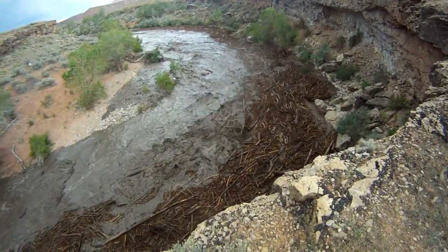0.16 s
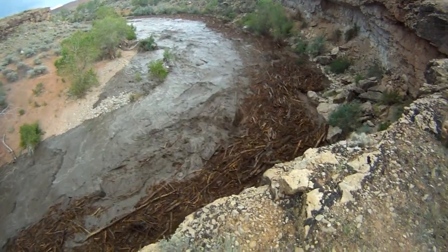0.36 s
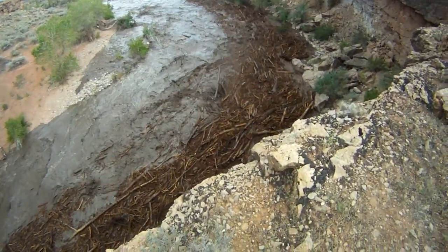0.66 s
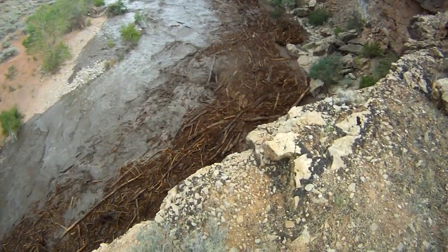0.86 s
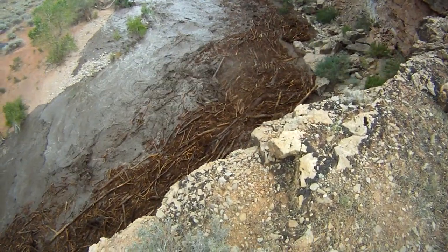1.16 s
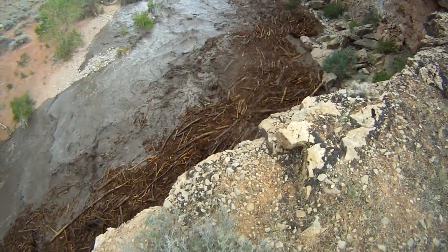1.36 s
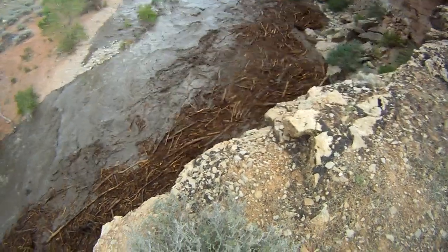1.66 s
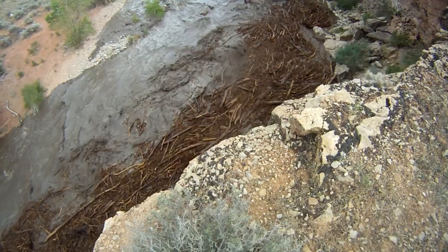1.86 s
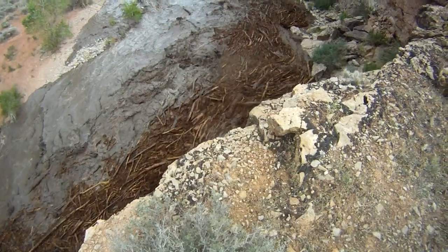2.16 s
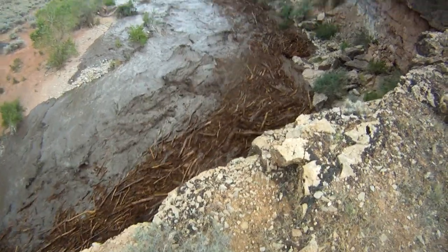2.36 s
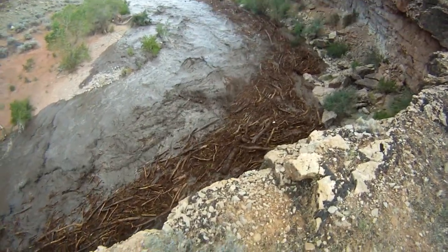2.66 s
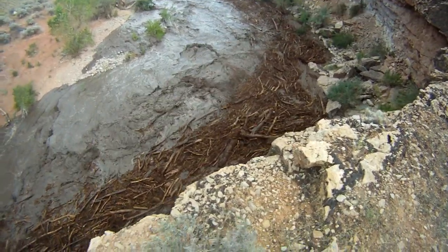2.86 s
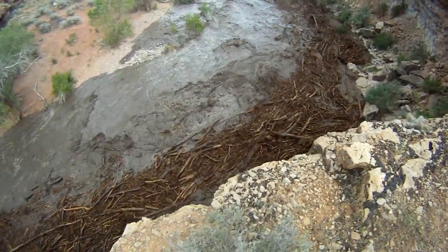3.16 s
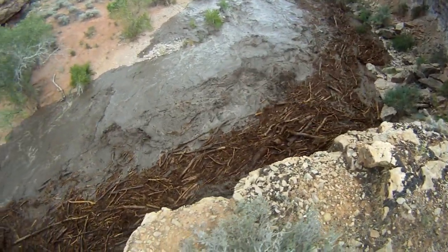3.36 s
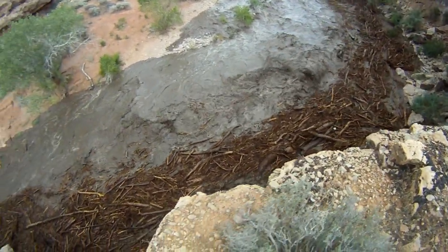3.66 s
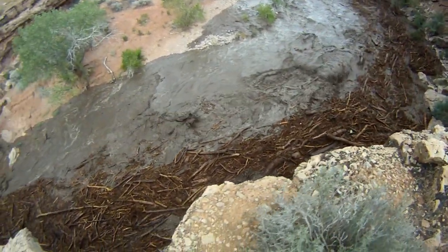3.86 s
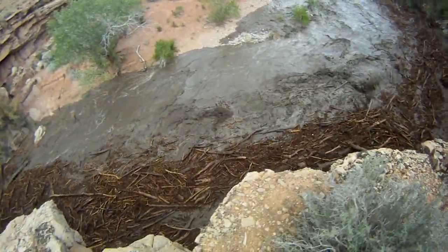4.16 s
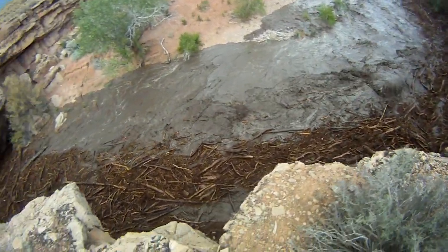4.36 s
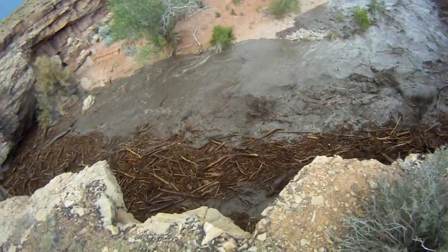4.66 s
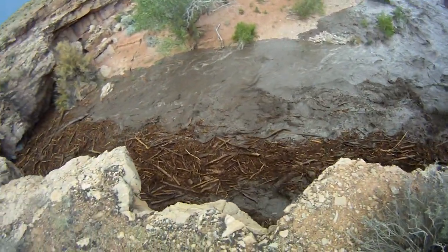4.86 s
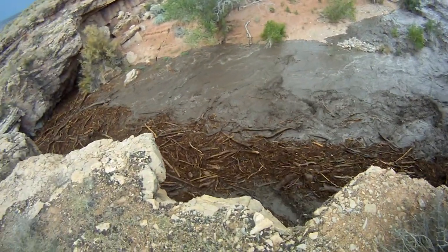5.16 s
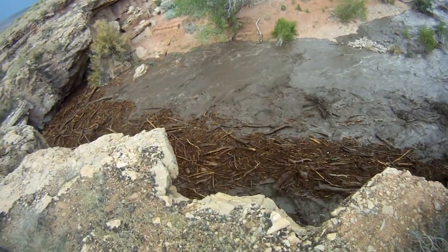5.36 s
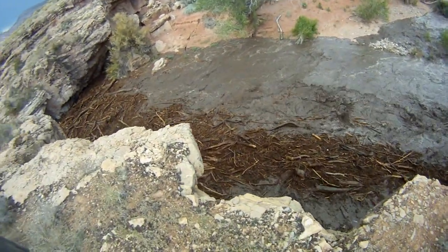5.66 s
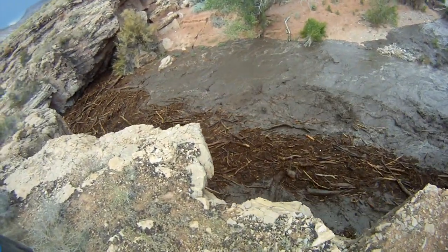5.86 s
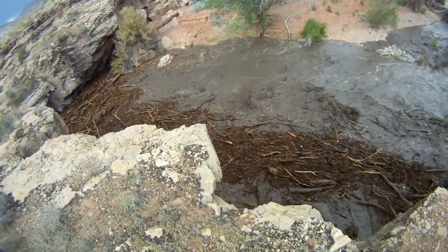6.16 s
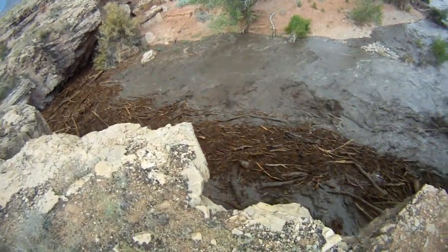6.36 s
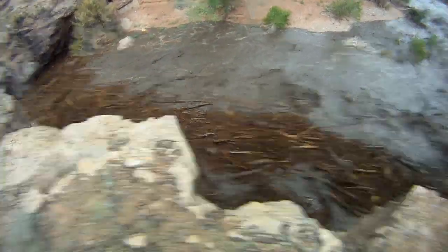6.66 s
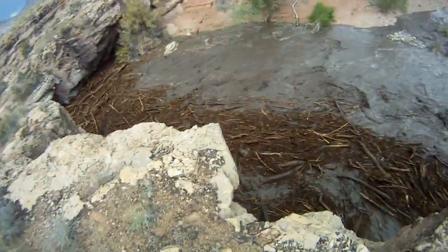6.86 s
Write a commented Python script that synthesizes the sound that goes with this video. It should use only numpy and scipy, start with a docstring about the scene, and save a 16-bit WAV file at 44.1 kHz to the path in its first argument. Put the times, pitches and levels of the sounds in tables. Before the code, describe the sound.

Close microphone handling noise, with scrapes, thumps and sharp ratcheting clicks, above faint rushing floodwater and an occasional driftwood crack.

```python
"""Handling noise above a flood

From a ledge, a small hand-held camera picks up a muddy flood rushing along the wash below, its driftwood
cracking now and then. Right at the microphone, and far louder than the water, fingers rub, slip, bump
and click on the camera body, and a light wind rumbles. The gain control ducks after loud clicks and
the sharpest ones overload the input."""
import sys
import numpy as np
from scipy import signal
from scipy.fft import rfft, irfft, next_fast_len
from scipy.io import wavfile
from scipy.ndimage import uniform_filter1d

SR = 44100
rng = np.random.default_rng(int(sys.argv[2]) if len(sys.argv) > 2 else 0)


def digitize_waveform(pressure):
    """Quantize a signal to 16-bit integers and store it at the path in sys.argv[1].

    Rows of a 2-D input are taken as channels; values are limited to [-1, 1].
    """
    field = np.atleast_2d(pressure).T
    bounded = np.clip(field, -1, 1)
    quanta = np.round(bounded * 32767).astype(np.int16)
    wavfile.write(sys.argv[1], SR, quanta)


N = 309582

# finger strokes on the camera: start_s, level_db, rise_s, fall_s, grip (0-1), grille_share (0-1)
FINGER_STROKES = [(.05, -43, 0.047, .17, 0.5, 0.27), (.146, -13, .009, .023, .9, .4),
                  (1.589, -23, .002, 0.022, 0.48, 0.2), (1.656, -11.5, 0.023, 0.0093, 0.52, 0.23),
                  (1.68, -22, 0.019, 0.055, 0.2, 0.67), (1.774, -20, 0.024, 0.033, 0.05, .32),
                  (1.813, -30, 0.051, 0.03, .6, .25), (2.19, -37.5, .26, .42, .15, .25),
                  (2.538, -13, .002, 0.008, 1, 0), (2.66, -21, .014, 0.0093, 1, 0),
                  (2.767, -19.5, 0.044, 0.071, 0.08, 0.66), (6.688, -36.5, 0.085, .095, 0.13, 0.23),
                  (6.931, -17, .005, .032, 0, 0), (6.948, -29, 0.02, 0.089, 0, 0.05)]
# skin on the case with a light touch: frequency_hz, level_db
LIGHT_TOUCH_SPECTRUM = [(600, -22), (880, 1), (1150, 7), (1450, -1.5), (2100, 3.5), (2700, -21),
                        (3700, -13.5), (4300, -37), (5100, -28), (7700, -32), (9200, -23), (10000, -10),
                        (14000, -7), (15200, -52)]
# skin on the case with a tight grip: frequency_hz, level_db
TIGHT_GRIP_SPECTRUM = [(500, -22.5), (1000, -14.5), (1900, 2.5), (2700, -12), (3600, -24.5), (4300, -42.5),
                       (7000, -56), (9000, -28), (10100, -11), (10900, -21.5), (13000, -57), (13900, -11.5),
                       (15200, -39.5)]
# skin across the microphone grille: frequency_hz, level_db
GRILLE_SPECTRUM = [(500, -28.5), (1000, -15.5), (2000, -5.5), (2800, 0), (3500, -1), (4300, -20),
                   (5000, 11.5), (5600, -15), (7000, -1.5), (7800, -29), (8400, -9.5), (10000, -17),
                   (10900, -23), (14500, -21)]
# shell resonances that every rub brings out: centre_hz, half_width_hz, gain_db
SHELL_RESONANCES = [(770, 150, 4), (2196, 124, 3), (3765, 92, 6), (4920, 200, -4.5), (8320, 100, 9),
                    (9880, 140, 4.5), (14800, 440, 5.5)]
# the skin catches and snaps free, plus one lone click of the control at 2.057 s: start_s, peak_db, grip (0-1)
SKIN_SLIPS = [(0.1427, 12, 0.47), (.277, -23.5, 1), (1.728, -3, 0.22), (2.057, -17, 0), (2.4875, -19.5, .4),
              (2.502, -18, .5), (2.552, 13.5, 0.91), (2.592, -17, 0.56), (2.6402, -16, 0.64),
              (2.7532, -19.5, 0.52), (2.824, 5.5, 0.34), (6.5904, 1, 0), (6.717, -23, 0.7),
              (6.768, -20, 0.8)]
# ringing of the plastic case: pitch_hz, level_db, t60_s
CASE_MODES = [(1285, -5.5, 0.014), (1783, 0, 0.0071), (2070, -5.5, 0.0085), (2447, 3, 0.0064),
              (3150, -3.5, 0.013), (3750, -18.5, 0.015), (4600, -2.5, 0.0018), (5580, -2, 0.0022),
              (7450, -29, 0.003), (8320, -18.5, 0.015), (8820, -12.5, 0.013), (9390, -15, 0.013),
              (10000, -13, 0.005), (14740, -14, .007), (15170, -26, .008)]
# a camera control ratchets: start_s, first_level_db, click_count (rounded), first_gap_s, final_gap_s
RATCHET_RUNS = [(1.8918, 24.5, 2, .0167, .01), (1.989, 23.5, 4.25, 0.015, 0.0094),
                (2.0819, 21, 6.05, .0232, .0047)]
# the hand bumps the body: start_s, level_db, push_hz, sway_share (0-1), ring_share (0-1)
HAND_BUMPS = [(.054, -10.5, 60.5, 0.02, 0.02), (1.591, 7, 66, 0.01, 0), (1.682, -2, 83.4, 0.05, 0.04),
              (1.726, -3.5, 79, 0, 0.01), (2.211, -13.5, 91, 0, 0.07), (2.502, -14.5, 123, 0, 0.12),
              (2.823, 1, 269, 0.07, .05), (6.249, -25, 99, 0.03, 0.12), (6.581, 5.5, 79, 0.17, 0.07),
              (6.674, -8, 53.4, 0.08, 0), (6.348, -42, 254, 0, 1), (6.77, -21, 255, 0, 1),
              (6.921, -2, 137, 0.29, 0.22)]
# the rushing water, heard from the ledge: frequency_hz, level_db
FLOOD_SPECTRUM = [(150, -4.5), (400, -8), (1000, -7), (1700, -5), (2800, -3.5), (4200, -14), (5500, -14.5),
                  (7700, -19), (9300, -14.5), (10700, -18), (13000, -19.5), (15200, -18)]
# the rock ledge shades one band while the camera faces it: time_s, centre_hz, depth_db
LEDGE_SHADE = [(.3, 1330, -2.5), (1, 1500, 5.5), (3, 1540, 4.5), (7, 1450, -0.5)]
# resonances of the microphone housing: centre_hz, half_width_hz, gain_db
HOUSING_RESONANCES = [(2232, 124, 10.5), (3585, 170, 6), (5080, 400, 8.5), (6960, 380, 9), (8460, 180, 5.5),
                      (9740, 108, 11), (14270, 82, 11)]
# driftwood cracks down in the stream: start_s, peak_db
WOOD_CRACKS = [(.876, -25), (3.998, -28), (4.675, -37), (5.452, -29), (5.775, -33), (6.178, -31.5)]
# wind and hand tremor at the microphone: frequency_hz, level_db
RUMBLE_SPECTRUM = [(12, -32), (30, 2.5), (50, -1.5), (90, -3), (140, -20.5), (210, -22), (270, -20),
                   (340, -25.5), (500, -46), (1200, -74)]
# the hand shifts its hold and the tremor swells: crest_s, half_width_s, level_db
HOLD_SHIFTS = [(.2, .11, -35), (.8, 0.067, -40), (1.12, 0.11, -43.5), (1.75, 0.092, -23),
               (2.42, 0.39, -34.5), (6.45, 0.093, -40), (6.72, 0.063, -24), (7.0, 0.055, -20)]
# two notches in the camera's sound: centre_hz, half_width_hz, gain_db
CAMERA_NOTCHES = [(5995, 417, -11.5), (11880, 907, -17)]


def finger_rubbing(smooth_db=-4, fullness=0.62, judder_db=1.5, judder_hz=70):
    """Each stroke is a dense run of tiny slips that swells and fades; the finger judders as it slides."""
    out = np.zeros(N)
    friction = unit(grains(N, per_s=1800, spread_db=2.3)) + amp(smooth_db) * rng.standard_normal(N)
    friction *= amp(judder_db * wander(judder_hz))
    for s, db, rise, fall, grip, grille in FINGER_STROKES:
        run = friction[round(s * SR):][:round((rise + fall) * SR)]
        pressure = np.interp(np.arange(len(run)) / SR, [0, rise, rise + fall], [0, 1, 0]) ** fullness
        rub = signal.fftconvolve(run, touch_response(grip, grille))[:len(run)]
        add(out, s, amp(db) * pressure * unit(rub))
    return out


def touch_response(grip, grille, size=1024):
    """What reaches the microphone through the case from one tiny slip of skin."""
    hz = abs(np.fft.fftfreq(size, 1 / SR))
    light_db = spectrum(LIGHT_TOUCH_SPECTRUM, hz)
    grip_db = grip * (spectrum(TIGHT_GRIP_SPECTRUM, hz) - light_db)
    grille_db = grille * (spectrum(GRILLE_SPECTRUM, hz) - light_db)
    log_gain = np.log(amp(light_db + grip_db + grille_db + bells(SHELL_RESONANCES, hz)))
    # minimum phase: the colour rings after the slip, never before
    return np.fft.ifft(np.exp(np.conj(signal.hilbert(log_gain)))).real


def skin_slips(length_s=0.0029, grille=0.56, ring_db=-6):
    """Skin snaps free: a brief crackle through the case, which rings more the looser the grip."""
    out, t = np.zeros(N), np.arange(SR // 80) / SR
    for s, db, grip in SKIN_SLIPS:
        burst = rng.standard_normal(len(t)) * np.exp(-(t / length_s) ** 2)
        skin = unit(touch_response(grip, grille * (1 - grip)))
        ring = unit(case_ring(np.arange(len(skin)) / SR, np.ones(len(CASE_MODES))))
        snap = signal.fftconvolve(burst, skin + amp(ring_db) * (1 - grip) * ring)
        add(out, s, amp(db) * snap / abs(snap).max())
    return out


def control_clicks(chatter=0.073, chatter_t60=0.011, push_db=-21, push_hz=150, push_t60=0.015):
    """Each hard snap of the control chatters a little, rings the case and nudges the microphone."""
    out, t = np.zeros(N), np.arange(SR // 20) / SR
    push = amp(push_db - 60 * t / push_t60) * np.sin(2 * np.pi * push_hz * t)
    clicks = list(ratchet())
    # the hand loads the case a little differently at each click
    detunes = rng.uniform(.992, 1.008, (len(clicks), len(CASE_MODES)))
    for (s, db), detune in zip(clicks, detunes):
        ring = case_ring(t, detune)
        blow = (t == 0) + chatter * rng.standard_normal(len(t)) * amp(-60 * t / chatter_t60)
        snap = 2 * signal.fftconvolve(blow, ring)[:len(t)] / ring[0]
        add(out, s, amp(db) * (snap + push))
    return out


def ratchet(gap_kept=.4, loss_db=4.5):
    """Start and level of each click: a run speeds up towards its final gap and weakens."""
    for s, db, count, first_gap, final_gap in RATCHET_RUNS:
        for k in range(round(count)):
            yield s, db - loss_db * k
            s += final_gap + (first_gap - final_gap) * gap_kept ** k


def case_ring(t, detune):
    """The modes of the plastic case after one sharp blow, each detuned by its own factor."""
    return sum(amp(db - 60 * t / t60) * np.cos(2 * np.pi * hz * factor * t)
               for (hz, db, t60), factor in zip(CASE_MODES, detune))


def hand_bumps(push_cycles=5.2):
    """A soft push dies within a few swings, leaving the camera swaying in the hand and its body ringing."""
    out = np.zeros(N)
    sway, ring = swing(hz=48, t60=0.82), swing(hz=262, t60=.17)
    for s, db, hz, sway_share, ring_share in HAND_BUMPS:
        push = swing(hz, t60=push_cycles / hz)
        add(out, s, amp(db) * (push + sway_share * sway + ring_share * ring))
    return out


def swing(hz, t60, rise_cycles=0.37):
    """One second of a dying low swing with a rounded start."""
    t = np.arange(SR) / SR
    onset = 1 - np.exp(-(t * hz / rise_cycles) ** 2)
    return onset * amp(-60 * t / t60) * np.sin(2 * np.pi * hz * t)


def flood(level_db=-45, patchy_db=0.84, swell_db=0.8, splash_db=-11):
    """Water churns below the ledge: a rush with drifting patches, grainy with countless splashes."""
    rush = rng.standard_normal(N) + amp(splash_db) * unit(grains(N, per_s=700, spread_db=4.5))
    hz, t, bands = signal.stft(rush, SR, nperseg=1024, noverlap=768)
    patches = uniform_filter1d(rng.standard_normal(bands.shape), size=12, axis=0)
    patches = unit(uniform_filter1d(patches, size=14, axis=1))
    swell = unit(uniform_filter1d(rng.standard_normal(len(t)), size=50))
    shade_hz, depth_db = follow(LEDGE_SHADE, t)
    shade_db = depth_db * bell(hz[:, None], shade_hz, width=340)
    bands *= amp(water_colour(hz)[:, None] - shade_db + patchy_db * patches + swell_db * swell)
    water = signal.istft(bands, nperseg=1024, noverlap=768)[1][:N]
    return unit(water) * amp(level_db)


def water_colour(hz):
    """The flood's spectrum in dB, heard through the microphone housing."""
    return spectrum(FLOOD_SPECTRUM, hz) + bells(HOUSING_RESONANCES, hz)


def driftwood(t60=0.021, bass_cut_hz=1500):
    """Sticks break below the ledge: short dry cracks with no bass."""
    out, t = np.zeros(N), np.arange(SR // 20) / SR
    for s, db in WOOD_CRACKS:
        burst = rng.standard_normal(len(t)) * amp(-60 * t / t60)
        crack = tint(burst, lambda hz: water_colour(hz) / 2 - 20 * bell(hz, 0, bass_cut_hz))
        add(out, s, amp(db) * crack / abs(crack).max())
    return out


def wind_and_tremor(breeze_db=-51.5, gust_db=3.0, gust_hz=14):
    """Low, lumpy buffeting on the microphone: a steady breeze, and a swell for each shift of the hand."""
    t = np.arange(N) / SR
    rumble = tint(rng.standard_normal(N), lambda hz: spectrum(RUMBLE_SPECTRUM, hz))
    gusts = amp(gust_db * wander(gust_hz))
    tremor_power = sum((amp(db) * bell(t, s, width)) ** 2 for s, width, db in HOLD_SHIFTS)
    return unit(rumble * gusts) * np.sqrt(amp(breeze_db) ** 2 + tremor_power)


def amp(db):
    """Decibels to gain."""
    return 10 ** (np.asarray(db) / 20)


def unit(x):
    """Scales to an rms of 1."""
    return x / np.sqrt(np.mean(x ** 2) + 1e-20)


def spectrum(points, hz):
    """Levels in dB, joined on a log-frequency axis."""
    point_hz, db = np.transpose(points)
    return np.interp(np.log(hz + 1), np.log(point_hz), db)


def follow(rows, t):
    """The columns of a curve at times t."""
    s, *columns = np.transpose(rows)
    return [np.interp(t, s, column) for column in columns]


def add(mix, s, sound):
    """Mixes a sound in at time s."""
    part = mix[max(round(s * SR), 0):][:len(sound)]
    part += sound[:len(part)]


def bell(x, centre, width):
    """A smooth bump of height 1."""
    return np.exp(-.5 * ((x - centre) / width) ** 2)


def bells(rows, hz):
    """Colour in dB of a set of peaks or dips."""
    return sum(db * bell(hz, centre, width) for centre, width, db in rows)


def tint(x, colour):
    """Filters x by a colour in dB that is a function of frequency."""
    size = next_fast_len(len(x))
    gain = amp(colour(np.fft.rfftfreq(size, 1 / SR)))
    return irfft(rfft(x, size) * gain, size)[:len(x)]


def wander(corner_hz):
    """Random drift with an rms of 1, mostly slower than corner_hz."""
    return unit(tint(rng.standard_normal(N), lambda hz: -40 * np.log10(1 + (hz / corner_hz) ** 2)))


def grains(samples, per_s, spread_db):
    """Random clicks, many small and a few large."""
    chance, size, sign = rng.random((samples, 3)).T
    size_db = spread_db * np.minimum(-np.log(1 - size), 4)
    return (chance < per_s / SR) * amp(size_db) * np.sign(sign - .5)


def scene():
    """Water below, wind and close handling all reach one microphone, which feeds both channels."""
    outdoors = flood() + driftwood() + wind_and_tremor()
    mono = outdoors + finger_rubbing() + skin_slips() + control_clicks() + hand_bumps()
    return np.array([mono, mono])


def record(dry, threshold_db=-22, slope=0.52, recover_db_per_s=130, attack_s=0.028, edge_hz=15400):
    """The camera ducks after loud peaks, clips what gets past, then notches and limits the treble."""
    lag = np.exp(-1 / (attack_s * SR))
    power = signal.lfilter([1 - lag], [1, -lag], np.clip(dry[0], -1, 1) ** 2)
    level_db = 10 * np.log10(power + 1e-12)
    # the gain control holds each peak and lets it sink at a steady rate
    fall_db = np.arange(N) * recover_db_per_s / SR
    held_db = np.maximum.accumulate(level_db + fall_db) - fall_db
    duck_db = slope * np.maximum(held_db - threshold_db, 0)
    clipped = np.clip(dry / amp(duck_db), -1, 1)
    notched = np.array([tint(channel, lambda hz: bells(CAMERA_NOTCHES, hz)) for channel in clipped])
    low_pass = signal.firwin(511, edge_hz, window=("kaiser", 9), fs=SR)
    return signal.oaconvolve(notched, low_pass[None], "same")


dry = scene()
out = record(dry)
digitize_waveform(out)
```